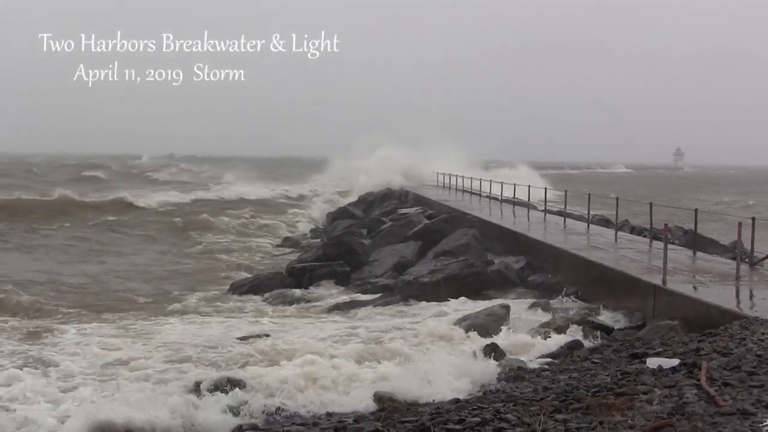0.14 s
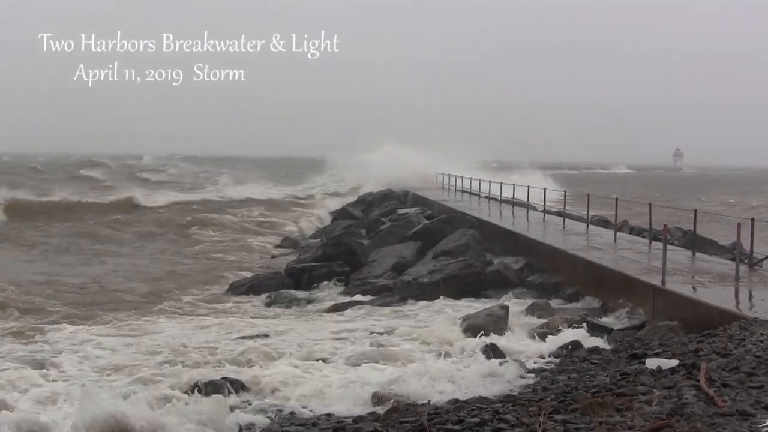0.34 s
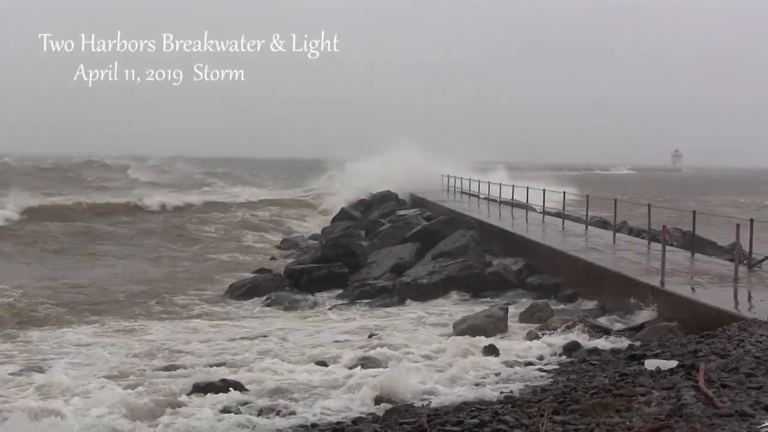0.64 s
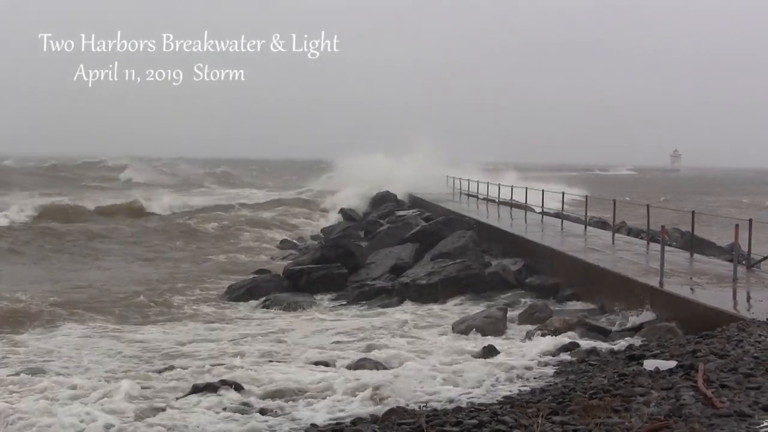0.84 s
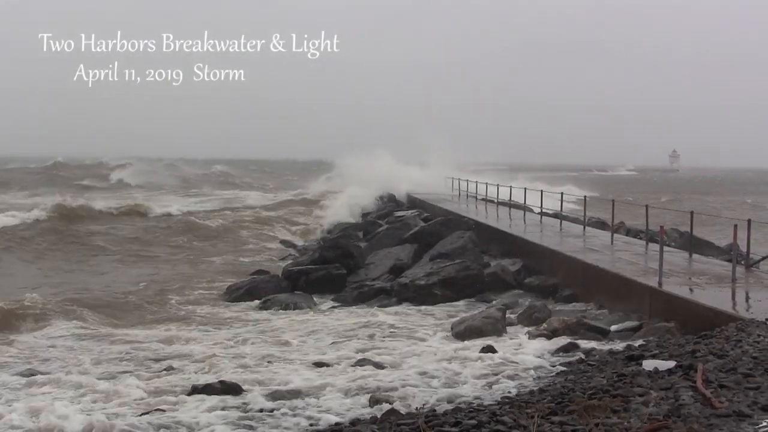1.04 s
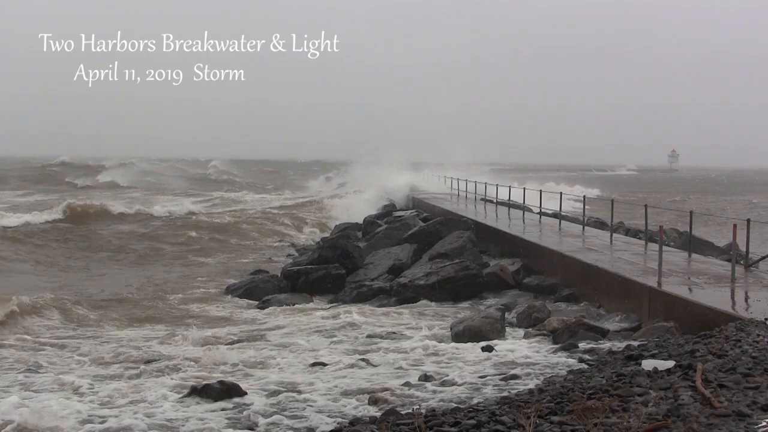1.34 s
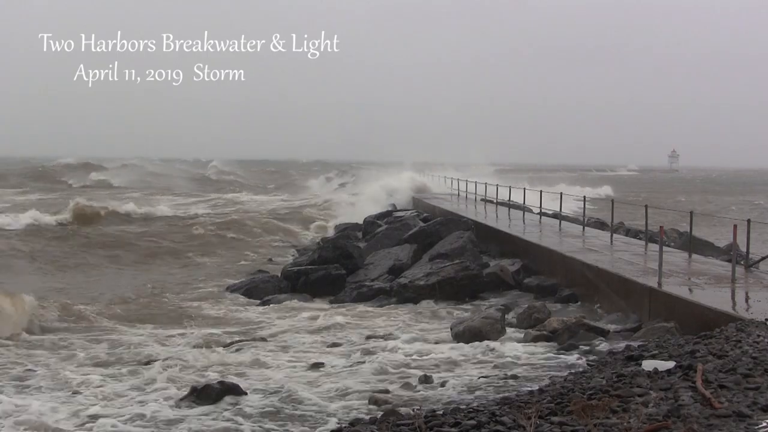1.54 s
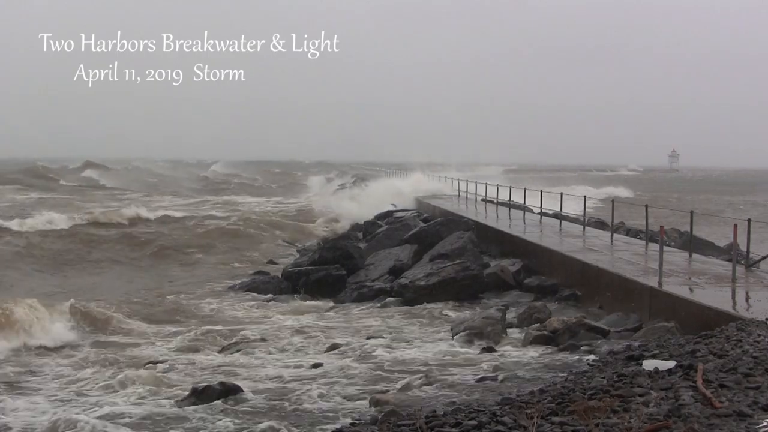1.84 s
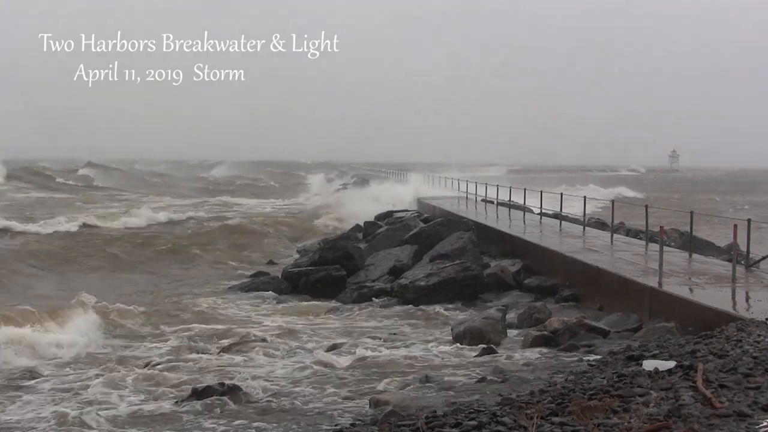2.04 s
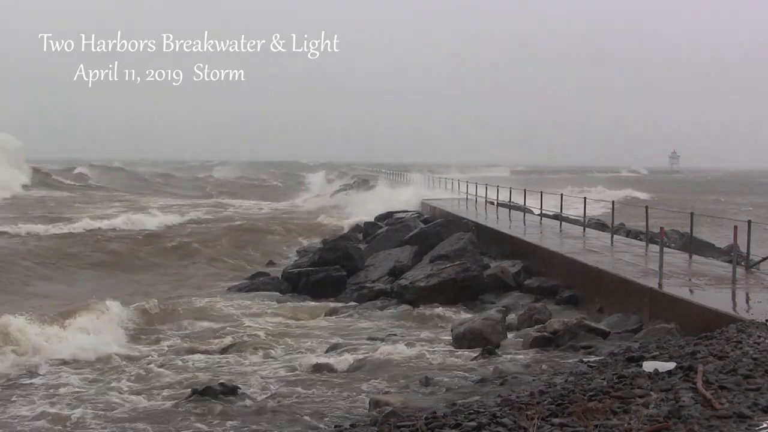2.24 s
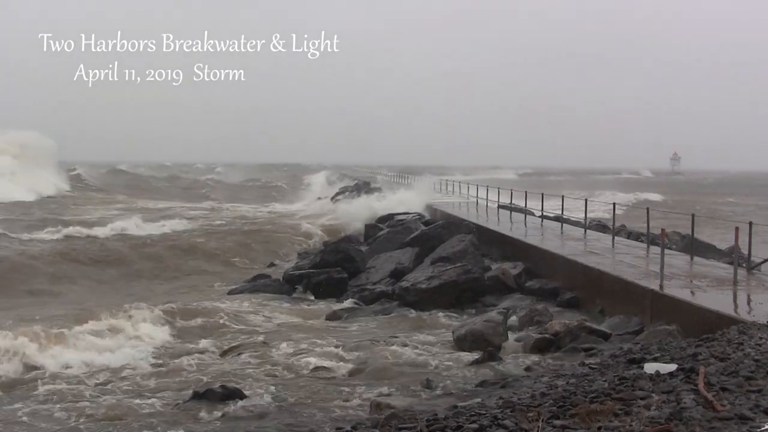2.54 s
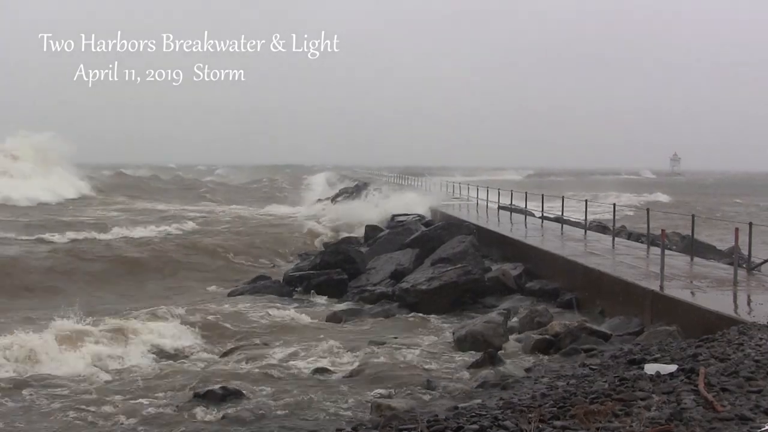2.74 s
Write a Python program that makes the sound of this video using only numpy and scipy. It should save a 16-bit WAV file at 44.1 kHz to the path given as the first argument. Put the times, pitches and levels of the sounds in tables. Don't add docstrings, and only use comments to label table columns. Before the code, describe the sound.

Strong wind buffeting a bare microphone with deep thumps, storm surf roaring behind and sinking away

```python
import sys
import numpy as np
from scipy import signal
from scipy.fft import rfft, irfft, next_fast_len
from scipy.io import wavfile
from scipy.ndimage import uniform_filter1d, minimum_filter1d, map_coordinates

SR = 44100
rng = np.random.default_rng(int(sys.argv[2]) if len(sys.argv) > 2 else 0)


def waveform_to_disk(signal):
    frames = np.transpose(np.atleast_2d(signal))
    scaled = np.clip(frames, -1, 1) * 32767
    samples = np.round(scaled).astype(np.int16)
    wavfile.write(sys.argv[1], SR, samples)


def field_ratio(decibels):
    return 10 ** (np.asarray(decibels, dtype=float) / 20)


N = 127449

# (time [s], rumble level [dB], flutter level before ducking [dB])
WIND_LEVELS = [(0, -11, -21), (.25, -12, -12.5), (.48, -11.5, -16.5), (.7, -8, -19.5), (1, -6, -20),
               (1.1, -10, -14.5), (1.19, -3, -24), (1.23, -13, -25), (1.38, -5, -27), (1.53, -6.5, -18),
               (1.62, -10, -28), (1.8, -13.5, -18.5), (1.96, -11.5, -22.5), (2.07, -5.5, -19.5),
               (2.35, -3, -18), (2.52, -6.5, -16), (2.79, -9.5, -21), (2.85, -15, -30)]
# (time [s], gain dip [dB], signed thump peak [full scale], thump pitch [Hz])
HARD_GUSTS = [(.202, -1, -.6, 55.6), (.37, 0.5, .75, 40.8), (0.548, -1, -.6, 55.6), (.634, 2, -.7, 44),
              (0.754, 3.5, -.75, 41), (0.802, 0, -.6, 39.4), (0.868, 0.5, .7, 52), (0.932, 1, .85, 45.5),
              (1.012, 7, .85, 55.7), (1.123, 4.5, .6, 92), (1.201, 4, .8, 37.4), (1.353, 2, .75, 39.4),
              (1.399, 0, -.85, 87.4), (1.523, -1.5, .5, 95), (1.558, 8, .9, 46.2), (1.597, 0, 0.73, 44.6),
              (1.652, -2.5, .75, 45), (1.684, 3, -.7, 49.7), (1.72, 0, 0.7, 41), (1.775, 1.5, -.8, 40),
              (1.802, 2.5, -.7, 52), (2.059, -0.5, .8, 50.6), (2.149, 2, .8, 39.4), (2.219, 1, -.75, 50),
              (2.261, -1, .7, 95), (2.383, 3, 1, 72), (2.443, 7, -.85, 66), (2.6, 3.5, -.85, 61),
              (2.656, 0.5, .7, 44.7), (2.758, 3, .7, 50.3)]
# (time fully mute [s], held pressure [full scale], gain dip afterwards [dB])
OVERLOADS = [
    (1.414, .97, 9),
    (2.836, .3, 0),
]


def unit(x):
    return x / np.sqrt(np.mean(x ** 2) + 1e-20)


def curves(rows):
    s, *columns = np.transpose(rows)
    return [np.interp(np.arange(N) / SR, s, column) for column in columns]


def wobble(rate_hz):
    knots = rng.standard_normal(int(N * rate_hz / SR) + 4)
    return map_coordinates(knots, [np.arange(N) * rate_hz / SR])


def smooth_step(u):
    return np.sin(np.pi / 2 * np.clip(u, 0, 1)) ** 2


def coloured(x, points):
    size = next_fast_len(N + 8192)
    f, db = np.transpose(points)
    log_hz = np.log(np.fft.rfftfreq(size, 1 / SR) + 1)
    gain = field_ratio(np.interp(log_hz, np.log(f + 1), db, right=-120))
    return unit(irfft(rfft(x, size) * gain, size)[:N])


def patchy(patchy_db, size):
    z = signal.stft(rng.standard_normal(N + 1024), nperseg=1024)[2]
    field = uniform_filter1d(rng.standard_normal(z.shape), size, 0)
    field = uniform_filter1d(field, size=5, axis=1)
    return unit(signal.istft(z * field_ratio(patchy_db * unit(field)), nperseg=1024)[1][:N])


def ceiling(x, hold_s):
    top, knee = .97, 8
    size = int(hold_s * SR)
    need = 1 / (1 + np.abs(x / top) ** knee) ** (1 / knee)
    return x * uniform_filter1d(minimum_filter1d(need, size), size)


def ducking_db():
    duck_s, recover_s = 0.013, 0.083
    t = np.arange(N) / SR
    dips = [(s, dip_db) for s, dip_db, *_ in HARD_GUSTS]
    dips += [(s, dip_db) for s, _, dip_db in OVERLOADS]
    total_db = np.zeros(N)
    for s, dip_db in dips:
        drop = smooth_step((t - s) / duck_s + 1)
        recovery = np.exp(-(np.clip(t - s, 0, None) / recover_s) ** 2)
        total_db += dip_db * drop * recovery
    return -total_db


def foam():
    pops_per_s, centre_hz = 4000, 2600
    draw = rng.random((int(pops_per_s * N / SR), 4))
    t = np.arange(96) / SR
    hz = np.clip(centre_hz * np.exp(2.22 * (draw[:, 1:2] - .5)), 300, 14000)
    loudness = field_ratio(-2 * np.log(draw[:, 2:3] + 1e-4))
    pops = loudness * np.sin(2 * np.pi * hz * t) * np.exp(-hz * t / 3.2)
    at = (draw[:, :1] * N).astype(int) + np.arange(96)
    return unit(np.diff(np.bincount(at.ravel(), pops.ravel(), N + 97))[:N])


def surf():
    # (time [s], level [dB])
    surf_levels = [(0, -15.5), (.36, -18), (.545, -18.5), (.575, -25), (.75, -21.5), (.86, -27), (1, -26.5),
                   (1.1, -26), (1.16, -28), (1.38, -29), (1.55, -28.5), (1.75, -32), (1.95, -31),
                   (2.2, -32.5), (2.37, -35.5), (2.48, -38), (2.57, -35.5), (2.89, -39)]
    # (frequency [Hz], density [dB per Hz])
    roar_colour = [(100, -14), (400, 0), (800, -0.5), (1500, -2.5), (3500, -7.5), (4100, -13),
                   (12000, -26.5), (15500, -36.5)]
    bubbles = field_ratio(-12.5) * foam()
    level_db, = curves(surf_levels)
    level_db = level_db + 0.22 * wobble(11.65)
    return field_ratio(level_db) * coloured(patchy(0.62, size=12) + bubbles, roar_colour)


def moan():
    centre_s, length_s, level_db = 1.105, 0.059, -20
    swell = np.exp(-((np.arange(N) / SR - centre_s) / length_s) ** 2)
    hz = 390 * (1 + 0.082 * wobble(35))
    return field_ratio(level_db + 2.6 * wobble(59.7)) * swell * np.sin(2 * np.pi * np.cumsum(hz) / SR)


def flutter():
    # (frequency [Hz], density [dB per Hz])
    flutter_colour = [(60, -7), (150, 0.5), (300, -4.5), (600, -14), (1000, -25.5), (2000, -32)]
    _, flutter_db = curves(WIND_LEVELS)
    eddies = unit(field_ratio(0.68 * wobble(21.8)) * coloured(patchy(0.92, size=4), flutter_colour))
    return field_ratio(flutter_db + 1.5) * eddies


def buffet():
    # (frequency [Hz], density [dB per Hz])
    rumble_colour = [(8, -50), (14, 4.5), (30, 1), (60, -1.5), (105, -4.5), (200, -15.5), (400, -73)]
    thump_cycles = 0.93
    rumble_db, _ = curves(WIND_LEVELS)
    rumble = unit(field_ratio(1.86 * wobble(13)) * coloured(patchy(1.3, size=1), rumble_colour))
    t = np.arange(N) / SR
    thumps = np.zeros(N)
    for s, _, peak, hz in HARD_GUSTS:
        swell = np.exp(-((t - s) * hz / thump_cycles) ** 2)
        thumps += peak * np.cos(2 * np.pi * hz * (t - s)) * swell
    return ceiling(field_ratio(rumble_db - 4) * rumble + thumps, hold_s=0.004)


def scene():
    ducked = field_ratio(ducking_db()) * (surf() + flutter())
    return (ducked + buffet() + moan())[None]


def band_limit(x):
    return signal.sosfilt(signal.butter(12, 15690, fs=SR, output="sos"), x)


def record(dry):
    close_s, shut_s, open_s, sag_s = 0.011, 0.0073, 0.023, 0.0055
    t = np.arange(N) / SR
    x = ceiling(dry, hold_s=0.0031)
    for s, held, _ in OVERLOADS:
        closed = smooth_step((t - s) / close_s + 1)
        reopened = smooth_step((t - s - shut_s) / open_s)
        sag = np.exp(-(np.clip(t - s, 0, None) / sag_s) ** 2)
        x = x * (1 - closed + reopened) + held * closed * sag
    return band_limit(x)


dry = scene()
out = record(dry)
waveform_to_disk(out)
```